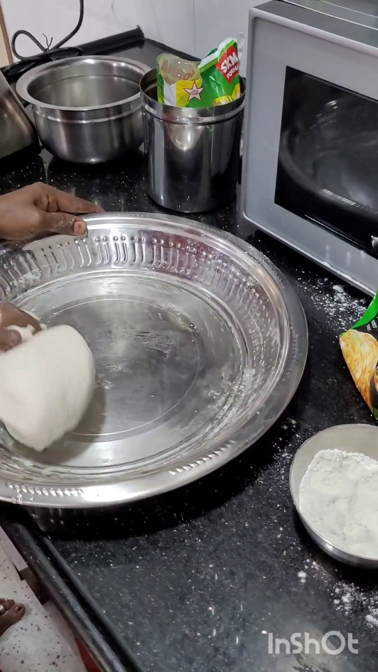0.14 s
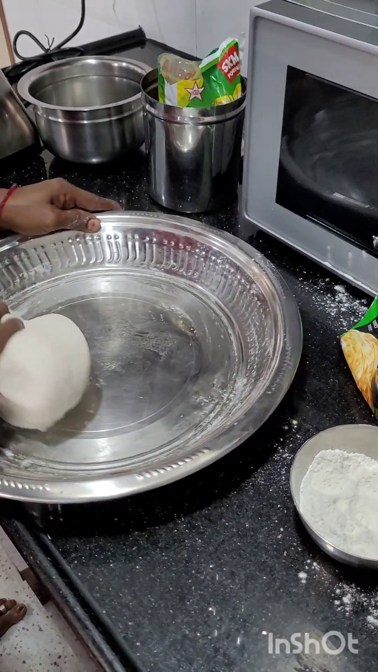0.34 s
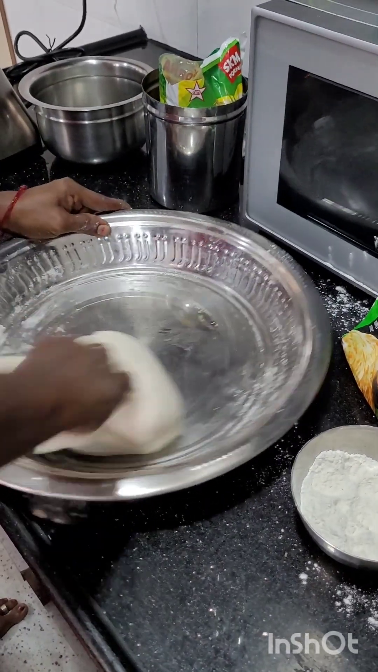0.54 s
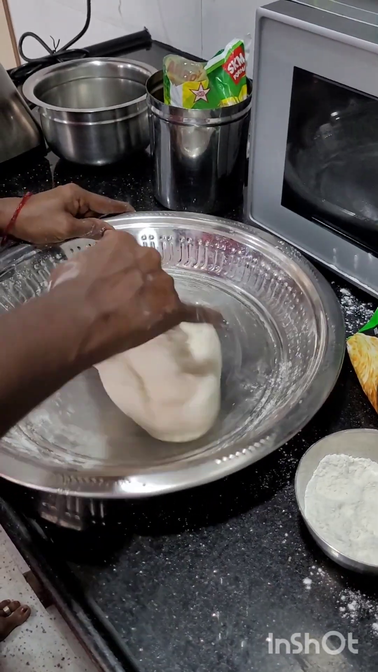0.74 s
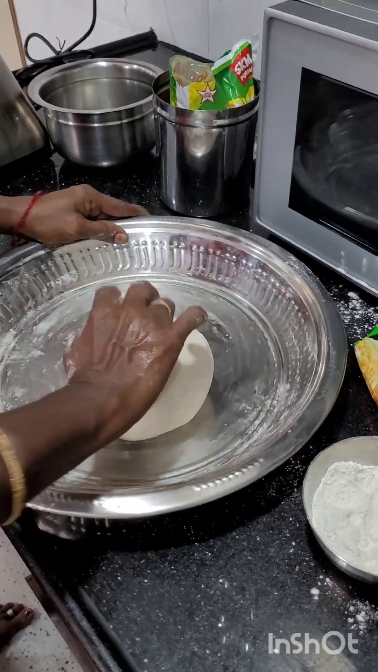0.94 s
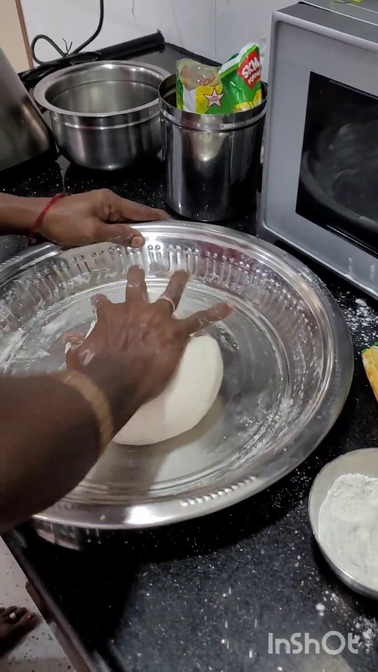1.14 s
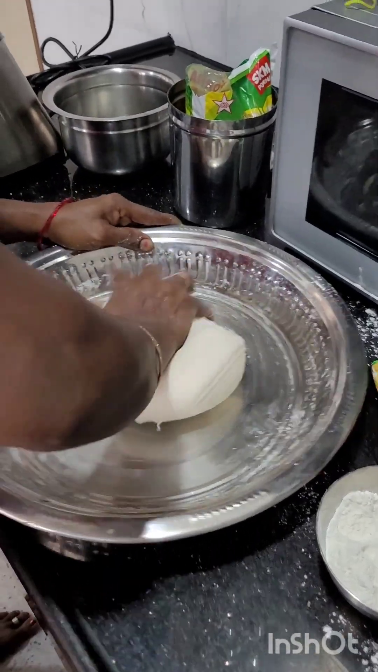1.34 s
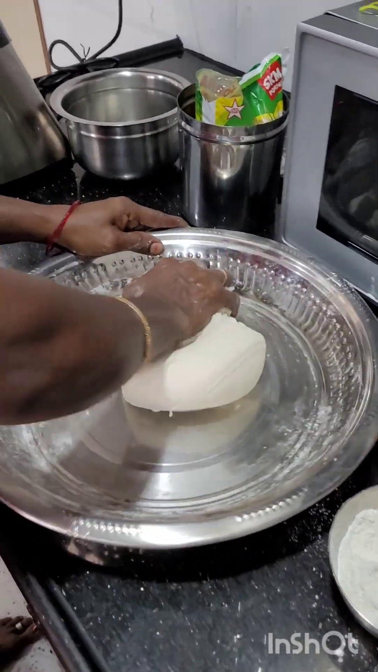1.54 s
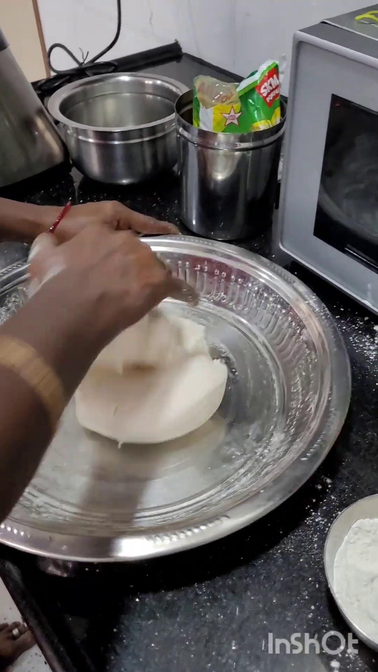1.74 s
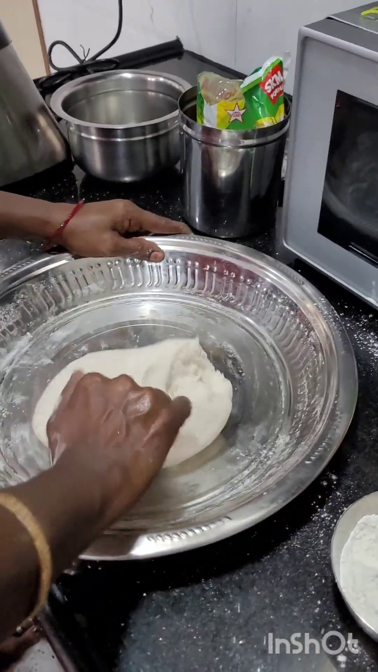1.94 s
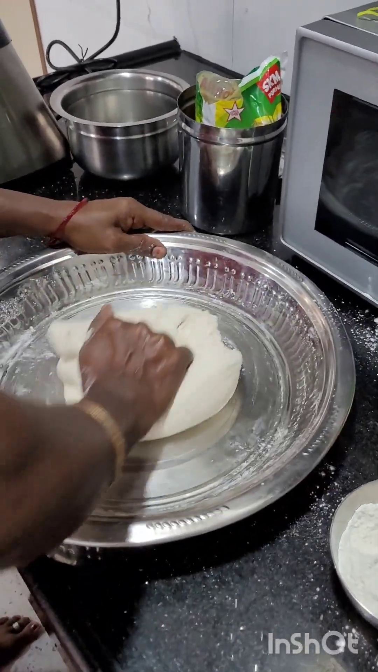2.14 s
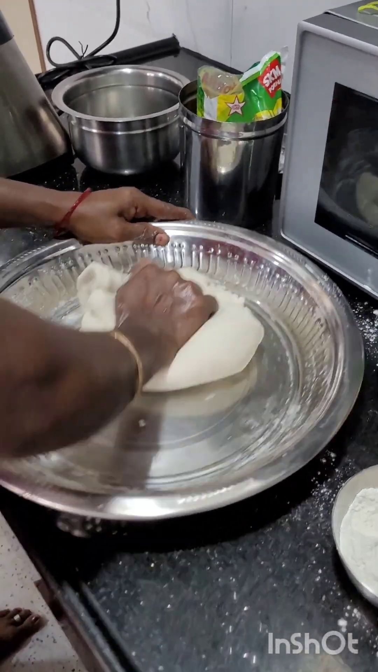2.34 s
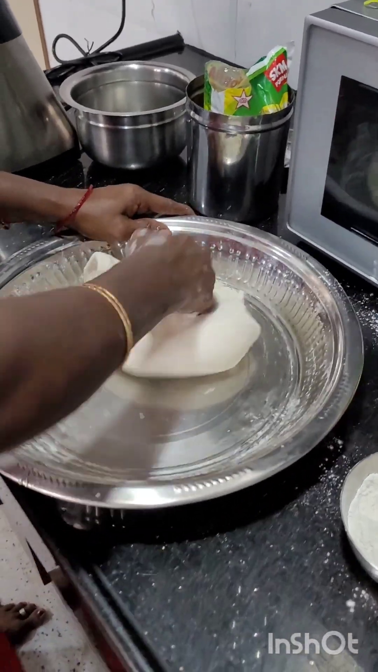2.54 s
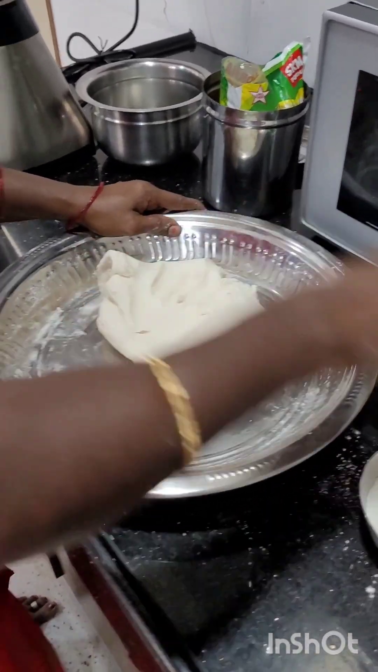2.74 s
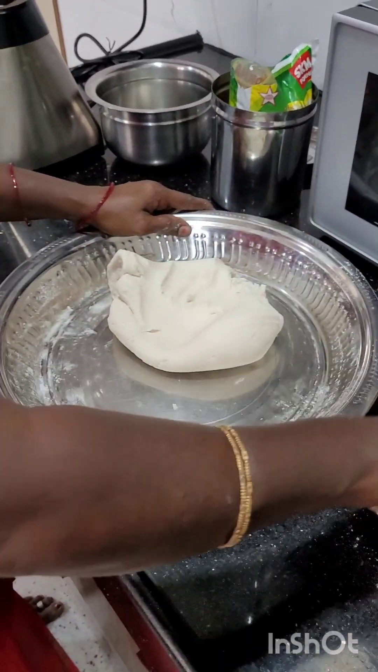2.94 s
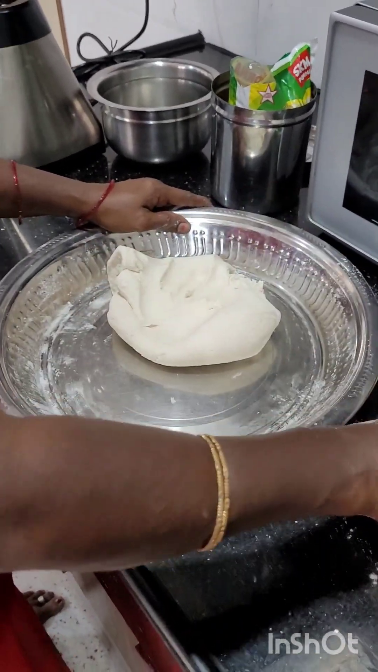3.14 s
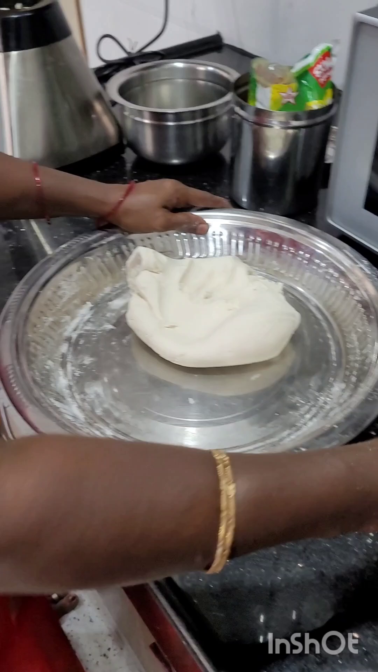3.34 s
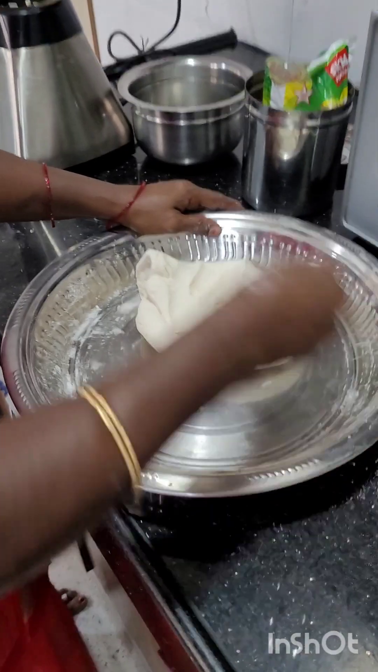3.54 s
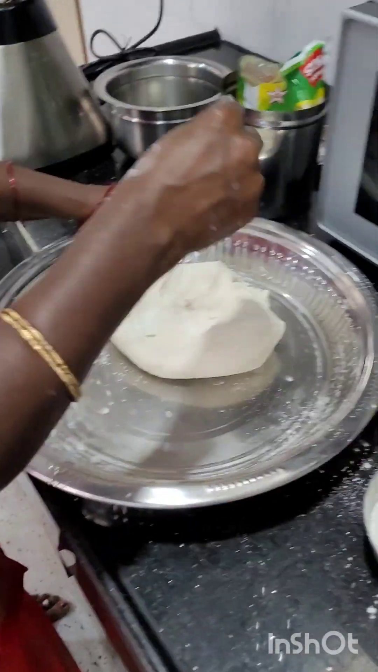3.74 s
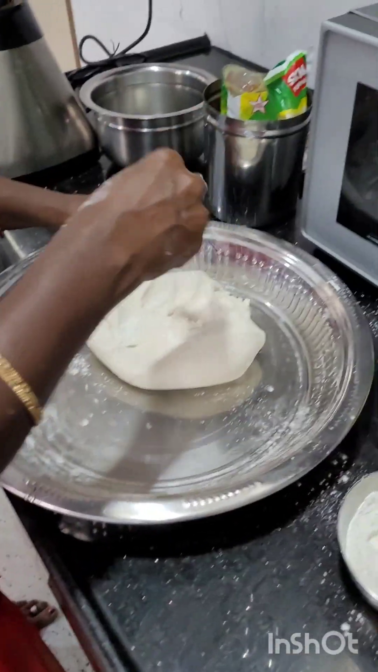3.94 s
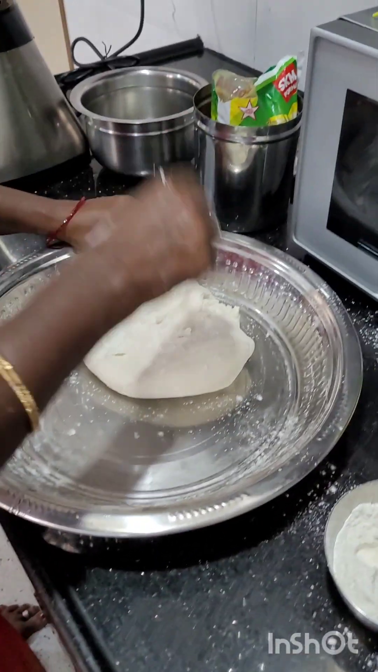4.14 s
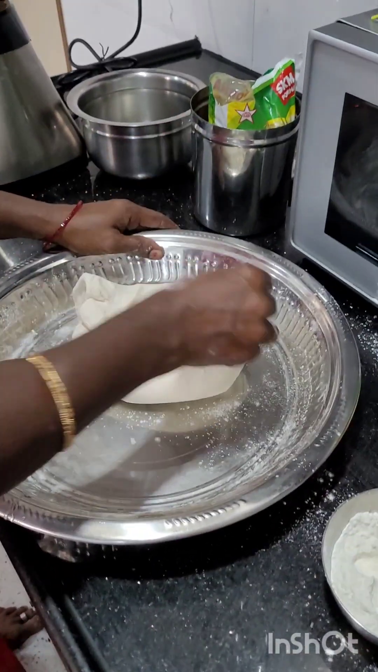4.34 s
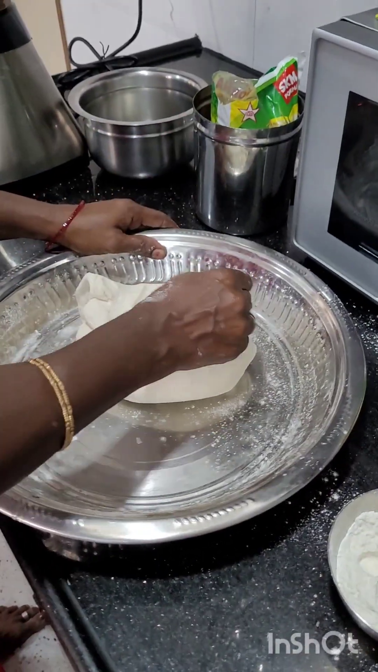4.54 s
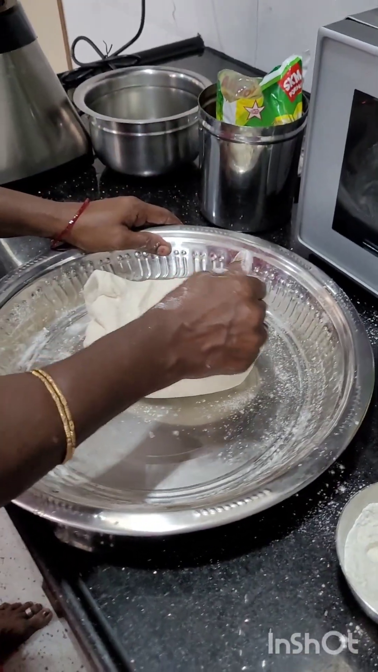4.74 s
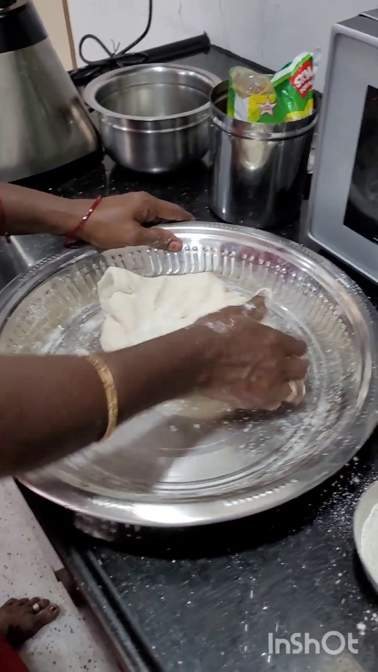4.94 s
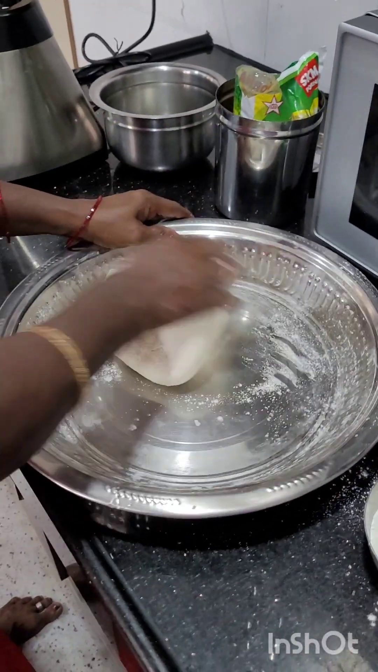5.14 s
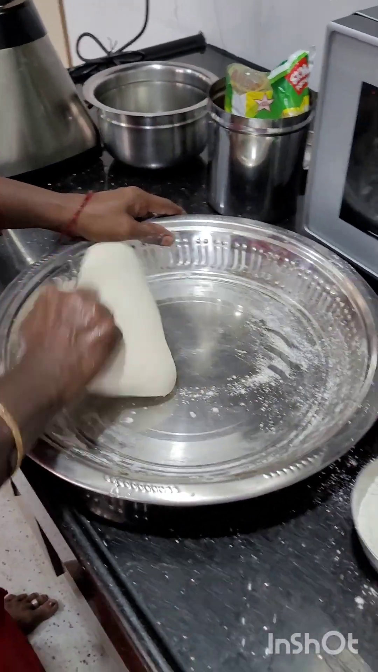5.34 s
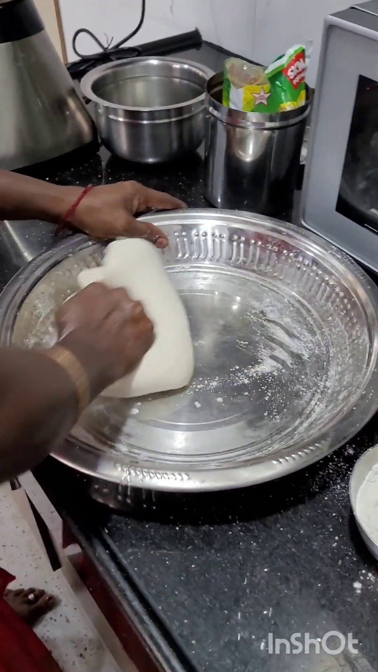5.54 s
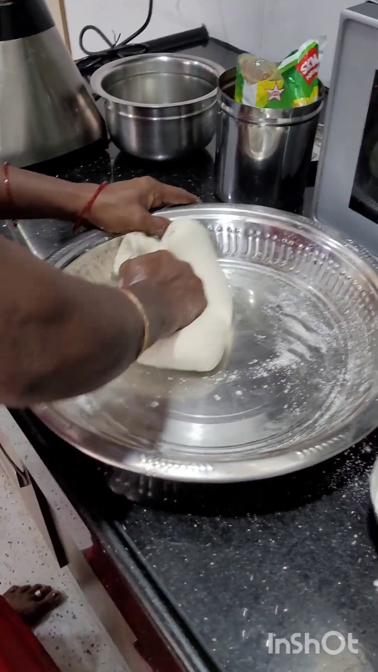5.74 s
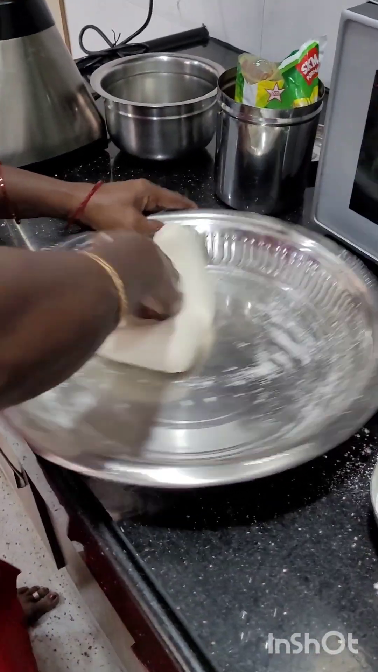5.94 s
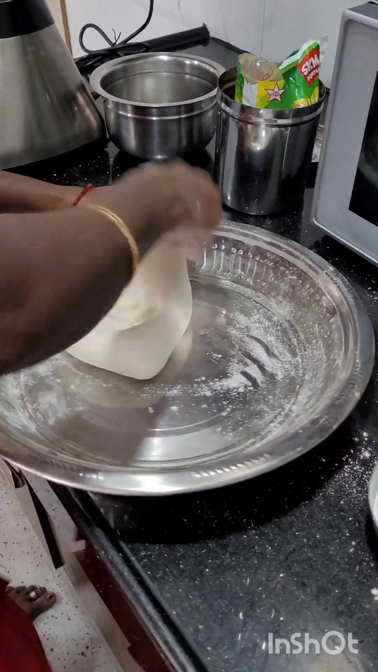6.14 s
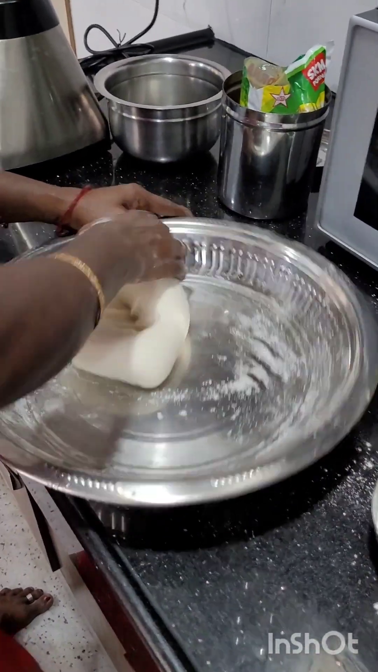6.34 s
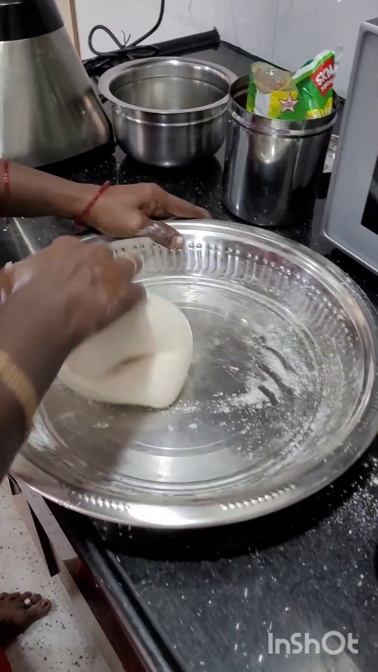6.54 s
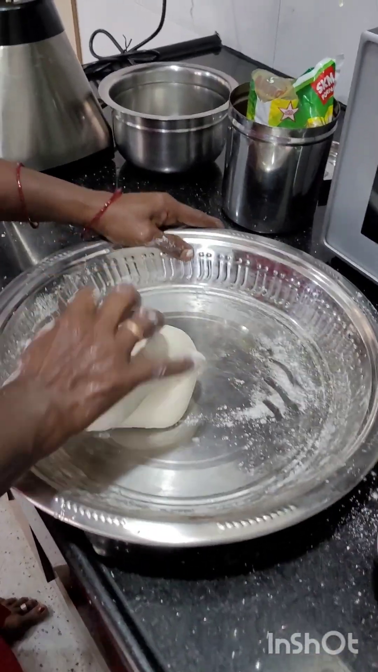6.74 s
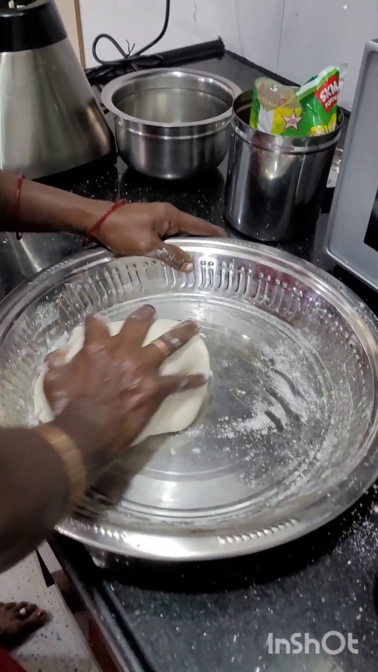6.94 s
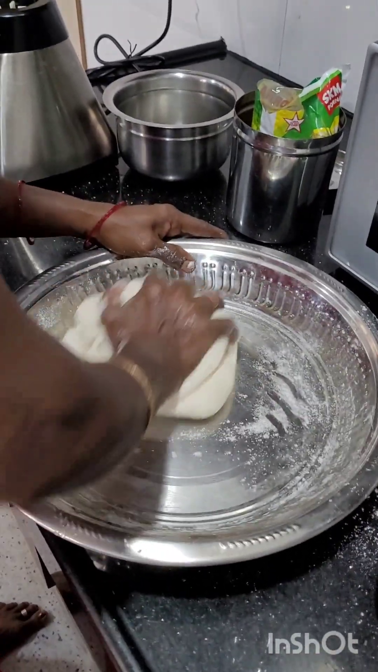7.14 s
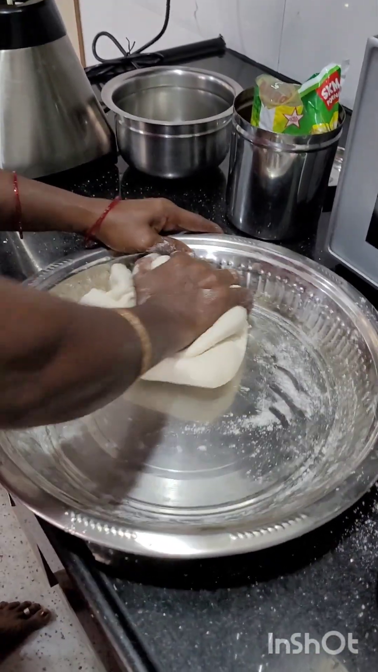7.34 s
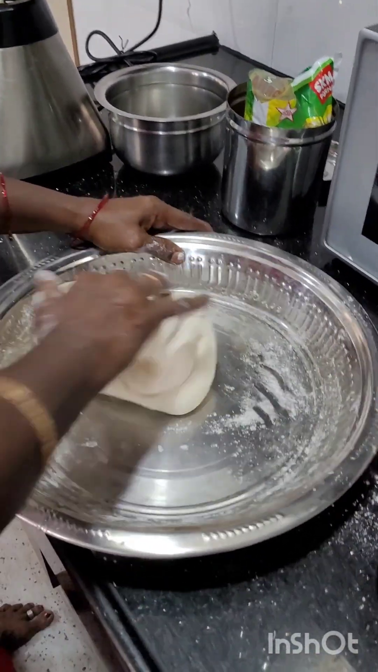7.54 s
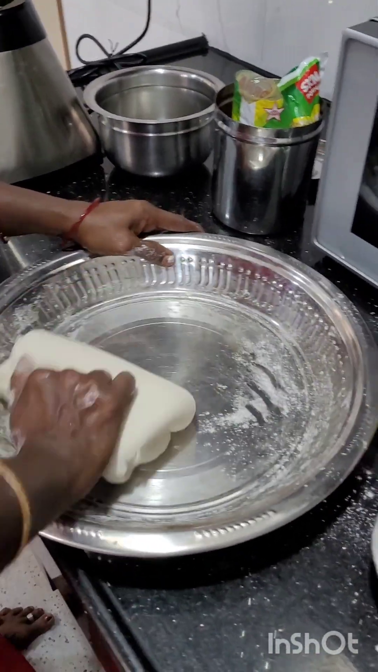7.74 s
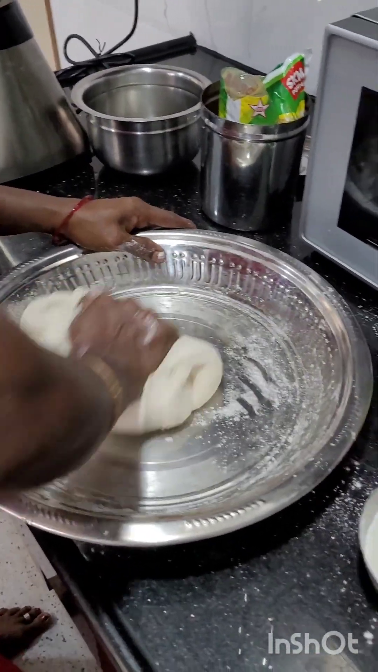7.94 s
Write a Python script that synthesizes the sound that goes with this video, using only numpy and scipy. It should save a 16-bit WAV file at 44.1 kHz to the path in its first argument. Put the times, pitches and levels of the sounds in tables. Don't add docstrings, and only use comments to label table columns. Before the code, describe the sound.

Close up in a small, tiled kitchen, soft dough is kneaded on a wide steel plate. Floury hisses and faint metal grumbles come in irregular strokes, with low thumps and sharp little ticks of bangles and nails. A brisk burst midway settles down, then vigorous working leads to a hard ringing plate knock, a second weaker one, and light slides and a deep final push.

```python
import sys
import numpy as np
from scipy import signal
from scipy.fft import rfft, irfft, next_fast_len
from scipy.io import wavfile
from scipy.ndimage import map_coordinates

SR = 44100
rng = np.random.default_rng(int(sys.argv[2]) if len(sys.argv) > 2 else 0)


def pcm_store(signal):
    levels = np.round(np.clip(np.atleast_2d(signal), -1, 1) * 32767)
    wavfile.write(sys.argv[1], SR, levels.astype(np.int16).T)


def boost_factor(decibels):
    exponent = np.asarray(decibels, float) / 20
    return 10 ** exponent


N = 352800

# time in [s], hiss level in [dB].
SLIDE_STROKES = [
    [(0.0, -60), (0.102, -61), (0.17, -77), (0.194, -61.5), (0.378, -53.5), (0.4, -48.5), (0.484, -43.5),
     (0.598, -52), (0.73, -73), (0.738, -63), (0.922, -72.5), (0.93, -67)],
    [(0.94, -55), (0.946, -58), (0.998, -65.5), (1.134, -58.5), (1.316, -76), (1.37, -59.5), (1.474, -58),
     (1.564, -71), (1.6, -62.5)],
    [(1.615, -58), (1.675, -57), (1.687, -41), (1.713, -49.5), (1.829, -61.5), (1.887, -58), (1.947, -69),
     (1.993, -60), (2.179, -89), (2.245, -67.5), (2.317, -58.5), (2.443, -71), (2.507, -58), (2.595, -58.5),
     (2.857, -84), (3.159, -91), (3.165, -76)],
    [(3.175, -60.5), (3.183, -48), (3.253, -50), (3.273, -41), (3.287, -50), (3.391, -51.5), (3.443, -38),
     (3.447, -43), (3.673, -66), (3.767, -50.5), (4.109, -69), (4.161, -86), (4.345, -86), (4.37, -66)],
    [(4.382, -59), (4.428, -51), (4.456, -57), (4.634, -52.5), (4.822, -75), (4.828, -59.5), (4.846, -71),
     (4.946, -77), (4.96, -58.5)],
    [(4.97, -53.5), (5.03, -51), (5.05, -59), (5.324, -72.5), (5.35, -79), (5.468, -58.5), (5.508, -64.5),
     (5.515, -61.5)],
    [(5.53, -40.5), (5.61, -44), (5.76, -43.5), (5.83, -58), (6.01, -52), (6.02, -35), (6.06, -44.5),
     (6.23, -64.5), (6.24, -46.5), (6.34, -73.5), (6.38, -50), (6.41, -56.5), (6.78, -55), (6.88, -88.5),
     (6.92, -40.5), (6.93, -67), (7.0, -67), (7.1, -53.5), (7.35, -56.5), (7.36, -45), (7.37, -61),
     (7.5, -54), (7.62, -70.5), (7.64, -43.5), (7.67, -60), (8.0, -57.5)],
]
# time in [s], body grumble in [dB], scrape on stone in [dB].
PLATE_SHIFTS = [
    [(0.0, -51.5, -60), (0.164, -66, -66.5), (0.266, -52.5, -65), (0.464, -71.5, -48), (0.58, -50, -50.5),
     (0.728, -71, -66), (0.76, -58, -65), (0.818, -74, -73), (0.872, -63, -77), (0.882, -71, -75),
     (0.925, -64, -77)],
    [(0.94, -41, -48), (0.95, -52, -54), (1.11, -58.5, -66), (1.14, -52.5, -59), (1.29, -69, -74.5),
     (1.48, -63, -57), (1.56, -64.5, -69), (1.7, -50.5, -49), (1.74, -57, -56), (2.13, -69.5, -76),
     (2.15, -63, -97), (2.17, -70.5, -80), (2.33, -63.5, -65.5), (2.43, -66, -74), (2.51, -56.5, -55),
     (2.58, -57, -65), (2.59, -50.5, -58.5), (2.75, -66, -70), (2.84, -65, -87), (3.16, -75, -92),
     (3.17, -47, -78)],
    [(3.172, -44, -56), (3.19, -44, -48), (3.504, -49.5, -50.5), (3.67, -65, -66), (3.714, -50.5, -59),
     (3.828, -65, -75.5), (4.078, -60, -73), (4.148, -72, -92), (4.222, -58, -89), (4.306, -76, -94),
     (4.316, -58, -69), (4.396, -65.5, -70), (4.636, -56.5, -71), (4.666, -63, -62), (4.82, -68.5, -86),
     (4.83, -57.5, -69), (4.94, -67, -76), (4.96, -58, -60)],
    [(4.97, -46, -52), (4.984, -53, -59), (5.09, -55.5, -57), (5.106, -52, -52.5), (5.386, -66, -77),
     (5.414, -72, -81.5), (5.454, -57.5, -62), (5.51, -50, -57)],
    [(5.525, -48, -47), (5.555, -42, -46), (5.763, -44.5, -42), (5.773, -37.5, -44), (5.843, -57, -58),
     (5.961, -46.5, -48.5), (6.01, -48.5, -51)],
    [(6.85, -63, -67.5), (6.892, -67, -76), (6.91, -74.5, -63), (6.924, -48.5, -55), (6.978, -65, -71),
     (7.372, -69, -63), (7.434, -61, -66), (7.46, -69, -59)],
    [(7.475, -46, -52), (7.479, -47.5, -43.5), (7.629, -63, -64), (7.635, -58, -49), (7.721, -66.5, -69),
     (7.755, -51.5, -50), (7.945, -63, -63.5), (8.0, -62, -71)],
]
# time in [s], slab rumble in [dB].
SLAB_LOAD = [(0.0, -62), (0.2, -67), (0.27, -53.5), (0.53, -59), (0.64, -74.5), (0.89, -71.5),
             (0.96, -48.5), (1.0, -47), (1.07, -63.5), (1.36, -68), (1.6, -67.5), (1.69, -55.5),
             (1.98, -65), (2.49, -69), (2.6, -56.5), (2.67, -54.5), (2.74, -69.5), (3.12, -69.5),
             (3.18, -54.5), (3.23, -52), (3.3, -61), (3.45, -67), (4.12, -72), (4.59, -67.5), (4.9, -76),
             (4.97, -53), (4.99, -51), (5.08, -53), (5.3, -72), (5.44, -71.5), (5.55, -54.5), (5.7, -59.5),
             (5.86, -73.5), (5.93, -49.5), (5.97, -52), (6.02, -42.5), (6.04, -41.5), (6.33, -59.5),
             (6.39, -47.5), (6.48, -51.5), (6.51, -47.5), (6.66, -55), (6.75, -66), (7.2, -70), (7.42, -66),
             (7.48, -49), (7.51, -46.5), (7.71, -60.5), (7.73, -50), (7.75, -41), (7.78, -40), (8.0, -55.5)]
# start in [s], peak in [dB], snap centre in [Hz], dull tap in [dB],
# left-right difference in [dB].
TICK_EVENTS = [(0.192, -50, 5640, -67, -2.0), (0.7357, -53, 8000, -68, -3),
               (0.9351, -32.5, 8500, -41, -3.5), (1.6152, -43, 3050, -43.5, -1.0),
               (1.6859, -22.5, 3530, -49.5, -7), (1.8774, -40.5, 12700, -58, -5),
               (1.9839, -37.5, 12600, -55, -4.5), (2.03, -48, 12300, -66, 0.5),
               (2.4907, -42.5, 3140, -46, 3), (3.014, -59.5, 11300, -74, -9.0),
               (3.1855, -33, 7750, -38.5, -12.5), (3.2216, -27.5, 5900, -42, -1),
               (3.27, -22.5, 5600, -30.5, -8), (3.2782, -30, 7310, -40.5, -4),
               (3.3265, -30.5, 4010, -36.5, -3), (3.4179, -27, 13300, -39, -7.5),
               (3.4384, -15, 10300, -34.5, -3.5), (3.493, -28, 8100, -38.5, -4),
               (3.5284, -27, 4100, -36, -4), (3.6865, -52, 3830, -47, -9),
               (3.715, -44.5, 4270, -44.5, -11.5), (3.9215, -52, 6720, -69, -16),
               (3.951, -47, 5220, -56, -10.5), (3.9873, -47, 9780, -66, -7), (4.039, -49, 4550, -63, -3),
               (4.0808, -49.5, 4130, -63, -9), (4.2108, -63, 6990, -62, -4), (4.3156, -57, 3430, -54, -9),
               (4.3789, -46, 7490, -67, -9), (4.3986, -39.5, 7800, -64, -9),
               (4.4768, -42.5, 9960, -63, -12), (4.573, -38.5, 8100, -67, -9.5),
               (4.622, -32, 4240, -49, -5.5), (4.6593, -35, 8330, -63, -5.5), (4.829, -40, 4240, -54, -3),
               (4.967, -36, 5620, -48, -1), (5.469, -43, 3500, -55, 0.5), (5.5208, -21, 4240, -39.5, -4),
               (5.5319, -30, 6570, -38, -3), (5.562, -24.5, 4100, -39.5, -6),
               (5.5734, -25.5, 3370, -39, -3), (5.7452, -24, 5000, -39.5, -3.5),
               (5.775, -29, 4760, -35.5, -3.5), (5.9183, -29.5, 3320, -44.5, -2.5),
               (5.9693, -34, 5140, -39, -2.0), (6.0207, -21, 5200, -12, -3.5),
               (6.2403, -31, 4800, -25, -0.5), (6.3724, -28, 3050, -15.5, 0), (6.576, -35, 5040, -42, -8),
               (6.619, -33.5, 8370, -44, -1.5), (6.6318, -31.5, 5040, -43, -2.5),
               (6.9122, -24, 11600, -48, -6.5), (7.032, -48.5, 6820, -63, -10.5),
               (7.0813, -34, 11600, -62, -7), (7.2214, -30.5, 4860, -54, -9),
               (7.3035, -38.5, 8240, -55, -2.5), (7.3577, -35.5, 10300, -61, -9.5),
               (7.4766, -30.5, 3550, -43, 0), (7.5398, -36.5, 3380, -46, -4.5),
               (7.637, -26.5, 9440, -45, -11.5), (7.6487, -29.5, 5370, -44, -8.0),
               (7.7268, -43.5, 3010, -45, -5), (7.7558, -35.5, 3030, -51, -4.5),
               (7.7952, -39, 5300, -56, -11), (7.884, -43.5, 3290, -60, -12.5),
               (7.9808, -43, 5150, -66, -10)]
# start in [s], peak in [dB], plate relative to slab in [dB].
THUMP_EVENTS = [
    (0.246, -48, 5),
    (0.939, -34.5, -3.5),
    (1.689, -50, 7.5),
    (2.579, -43, 3.5),
    (2.659, -55, 4),
    (3.18, -40, 2),
    (4.968, -38, 3),
    (5.929, -35.5, 0),
    (7.479, -36, 0.5),
    (7.754, -28.5, -8),
]
# start in [s], peak in [dB], brightness in [dB per octave].
KNOCK_EVENTS = [
    (6.02, -5, 1.5),
    (6.036, -10, 1),
    (6.047, -12.5, -0.5),
    (6.096, -17, -2),
    (6.371, -11.5, 0),
]

# frequency in [Hz], level in [dB], t60 in [s].
PLATE_MODES = [(256.4, -6, .8), (330.5, -8, 0.65), (447, -6, 0.45), (506, -11, 0.78), (620, -15.5, 0.52),
               (701, 0, 0.81), (738, -10, 0.51), (872, -6.5, 0.49), (955, -9.5, 0.98), (1010, -10.5, 0.39),
               (1068, -13.5, 0.37), (1110, -14, 0.32), (1284, -12.5, .5), (1350, -7, 0.4),
               (1416, -11, 0.51), (1550, -14, 0.43), (1603, -6, 0.3), (1810, -19.5, .4),
               (2105, -17.5, 0.27), (2340, -19, 0.46), (2500, -20.5, 0.65), (2558, -14.5, .5),
               (3640, -21.5, 0.23), (4370, -26.5, .3)]
# frequency in [Hz], level in [dB], t60 in [s].
COUNTER_MODES = [(57, -4, 0.24), (102.7, -2, .35), (146, -1.5, 0.16)]
# frequency in [Hz], level in [dB], t60 in [s].
DAMPED_MODES = [(240.5, -4.5, 0.19), (267.7, -3, 0.19), (331, -1.5, 0.13), (430, -6, 0.11), (613, -8, 0.17),
                (674, -4, 0.13), (859, -4.5, .1), (1300, -8, 0.087)]

# frequency in [Hz], density in [dB per Hz].
HISS_SPECTRUM = [(1760, -23), (3000, -9.5), (3780, -4.5), (4050, -3), (6530, -2.5), (11500, -3),
                 (15100, -9.5), (16000, -21.5)]
# frequency in [Hz], density in [dB per Hz].
BODY_SPECTRUM = [(71, -44), (120, -14), (177, -8.5), (232, -2), (279, -5.5), (698, -7.5), (773, -10),
                 (1100, -11.5), (1430, -38.5), (2420, -120)]
# frequency in [Hz], density in [dB per Hz].
SCRAPE_SPECTRUM = [(530, -32.5), (900, -10.5), (1260, 4.5), (1560, -1), (2520, -2), (2960, -5.5),
                   (4500, -8.5), (5850, -37.5), (9900, -120)]
# frequency in [Hz], density in [dB per Hz].
RUMBLE_SPECTRUM = [(28, -30.5), (45, -10.5), (56, -5.5), (78, -10.5), (101, 1), (125, -9), (160, -14.5),
                   (250, -42)]
# frequency in [Hz], density in [dB per Hz].
AIR_SPECTRUM = [(15, -61), (25, -38), (70, -10.5), (92, -4.5), (111, -12), (153, -20.5), (217, -1.5),
                (326, -15.5), (394, -3.5), (545, -23.5), (591, -28), (962, -43.5), (4250, -48.5),
                (9070, -35.5), (16000, -49.5)]
# frequency in [Hz], density in [dB per Hz].
KNOCK_SPECTRUM = [(35, -58.5), (60, -20.5), (210, -17.5), (253, -6), (359, -15), (443, -3), (533, -23.5),
                  (705, 1.5), (829, -10), (1380, -9.5), (1700, -18), (2530, -25), (15500, -59)]
# frequency in [Hz], left-right correlation in [-1 to 1].
PORT_LIKENESS = [(60, 0.87), (180, 0.95), (550, 0.48), (1650, -0.11), (4970, 0.21), (15000, 0.2)]
# frequency in [Hz], t60 in [s].
KITCHEN_T60 = [(100, 0.65), (700, 0.74), (2500, 0.69), (6000, 0.51), (15000, 0.23)]


def unit(x):
    return x / np.sqrt(np.mean(x ** 2) + 1e-20)


def lean(left_db):
    return boost_factor([[left_db], [-left_db]])


def along(points, hz):
    f, value = np.transpose(points)
    return np.interp(np.log(hz + 1), np.log(f + 1), value)


def curves(rows):
    s, *columns = np.transpose(rows)
    return [np.interp(np.arange(N) / SR, s, column) for column in columns]


def wobble(rate):
    knots = rng.standard_normal(int(N * rate / SR) + 4)
    return map_coordinates(knots, [np.arange(N) * rate / SR])


def filtered(x, response):
    n = x.shape[-1]
    m = next_fast_len(n + 8192)
    return irfft(rfft(x, m) * response(np.fft.rfftfreq(m, 1 / SR)), m)[..., :n]


def paired(pair, spectrum):
    def mid_side(hz):
        angle = np.arccos(np.clip(along(PORT_LIKENESS, hz), -1, 1)) / 2
        return boost_factor(along(spectrum, hz)) * [np.cos(angle), np.sin(angle)]

    mid, side = filtered(pair, mid_side)
    return np.array([mid + side, mid - side])


def rush(spectrum, grit_db, lump_db):
    grit = grit_db * np.abs(wobble(260)) ** 2
    slips = boost_factor(grit + lump_db * wobble(35))
    return unit(paired(slips * rng.standard_normal((2, N)), spectrum))


def dough():
    hiss_db, = curves(np.concatenate(SLIDE_STROKES))
    body_db, scrape_db = curves(np.concatenate(PLATE_SHIFTS))
    rumble_db, = curves(SLAB_LOAD)
    hiss = boost_factor(hiss_db - 1.3) * rush(HISS_SPECTRUM, grit_db=0.5, lump_db=1.0) * lean(-2.2)
    body = boost_factor(body_db + 1.0) * rush(BODY_SPECTRUM, grit_db=1.0, lump_db=1.74) * lean(-1.1)
    scrape = boost_factor(scrape_db + 0.9) * rush(SCRAPE_SPECTRUM, grit_db=0.67, lump_db=0.7) * lean(-1.3)
    rumble = boost_factor(rumble_db - 2.5) * rush(RUMBLE_SPECTRUM, grit_db=0.0, lump_db=0.6) * lean(-0.9)
    return hiss + body + scrape + rumble


def kitchen():
    air = boost_factor(-62) * rush(AIR_SPECTRUM, grit_db=-0.2, lump_db=0.3) * lean(-0.9)
    hum_level = boost_factor(-67.5 + 1.3 * wobble(8.2))
    phase = 2 * np.pi * 100.3 * np.arange(N) / SR + 0.33 * wobble(5)
    return air + hum_level * np.sin(phase)


def add(track, s, sound):
    start = round(s * SR)
    track[:, start:start + sound.shape[1]] += sound


def ticks():
    out, t = np.zeros((2, N + SR)), np.arange(SR // 16) / SR
    decay = boost_factor(-60 * t / 0.0089) + boost_factor(-16.5 - 60 * t / 0.13)

    def tap_response(f):
        return 1 / (1 + (f / 2400) ** 4) / (1 + (550 / (f + 1)) ** 4)

    for s, db, centre_hz, tap_db, pan_db in TICK_EVENTS:
        def snap_response(f):
            peak = 0.4 + 1 / (1 + ((f - centre_hz) / 1800) ** 2)
            return peak / (1 + (2600 / (f + 1)) ** 4) * (f < 16500)

        burst = rng.standard_normal((2, 2, len(t))) * decay
        snap = filtered(burst[0], snap_response)
        tap = filtered(burst[1], tap_response)
        both = boost_factor(db + 4) * snap / np.abs(snap).max()
        both = both + boost_factor(tap_db + 6.5) * tap / np.abs(tap).max()
        add(out, s, both * lean(pan_db / 2))
    return out[:, :N]


def ring(modes, t, scatter_db, rise):
    hz, db, t60 = np.transpose(modes)[:, :, None]
    strength, skew, phase = rng.standard_normal((3, len(modes), 1))
    lag = np.clip(hz / 1200, 0, 1.1) * skew * [[[1]], [[-1]]]
    decay = boost_factor(db + scatter_db * strength - 60 * t / t60)
    tones = decay * np.sin(2 * np.pi * hz * t + lag + phase)
    return tones.sum(axis=1) * (1 - np.exp(-t / rise))


def thumps():
    out, t = np.zeros((2, N + SR)), np.arange(SR // 2) / SR
    for s, db, plate_db in THUMP_EVENTS:
        add(out, s, boost_factor(db - 5.5) * ring(COUNTER_MODES, t, scatter_db=3.5, rise=0.022))
        add(out, s, boost_factor(db + plate_db - 6) * ring(DAMPED_MODES, t, scatter_db=5, rise=0.0031))
    return out[:, :N] * lean(-0.9)


def tail(t, spectrum):
    noise = paired(rng.standard_normal((2, len(t))), spectrum)
    hz, frames, z = signal.stft(noise, SR, nperseg=256)
    decay = boost_factor(-60 * frames / along(KITCHEN_T60, hz)[:, None])
    z = unit(np.abs(z)) * np.exp(1j * np.angle(z)) * decay
    wash = signal.istft(z, SR, nperseg=256)[1]
    return wash[:, :len(t)] / np.sqrt(256 / 3)


def knocks():
    out, t = np.zeros((2, N + SR)), np.arange(SR) / SR
    for s, db, tilt_db in KNOCK_EVENTS:
        def tilt(f):
            return boost_factor(tilt_db * np.log2((f + 50) / 700))

        wash = tail(t, KNOCK_SPECTRUM) * (1 - np.exp(-t / 0.0018))
        room_and_crack = wash * (boost_factor(-13.5) + boost_factor(-5.5 - 60 * t / 0.045))
        blow = boost_factor(-14) * ring(PLATE_MODES, t, scatter_db=1.0, rise=0.002) + room_and_crack
        add(out, s, boost_factor(db) * filtered(blow, tilt))
    return out[:, :N] * lean(-1.4)


def scene():
    return dough() + ticks() + thumps() + knocks() + kitchen()


def top_cut(x):
    return signal.sosfilt(signal.butter(12, 16800, fs=SR, output="sos"), x)


def record(dry):
    return top_cut(dry)


dry = scene()
out = record(dry)
pcm_store(out)
```